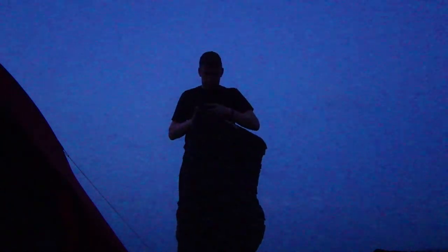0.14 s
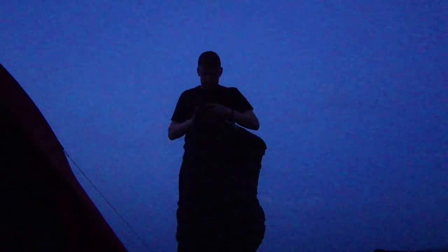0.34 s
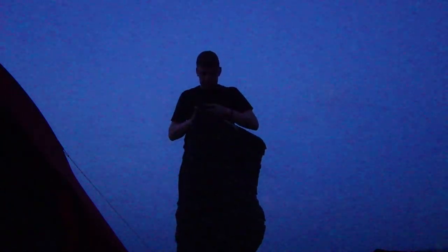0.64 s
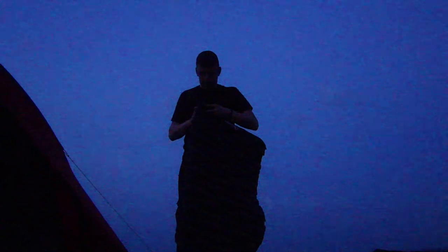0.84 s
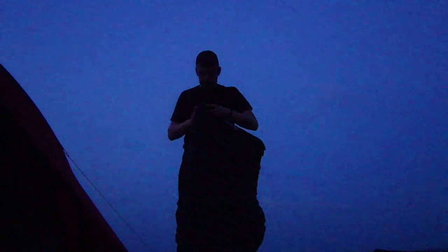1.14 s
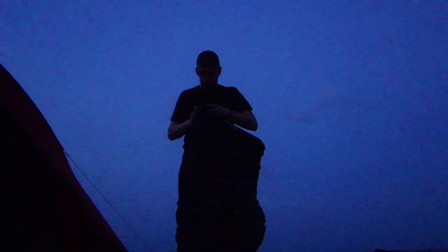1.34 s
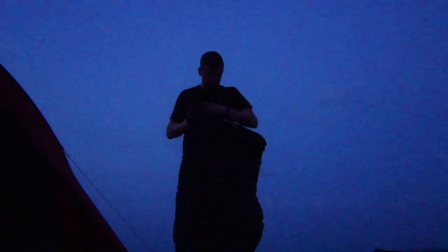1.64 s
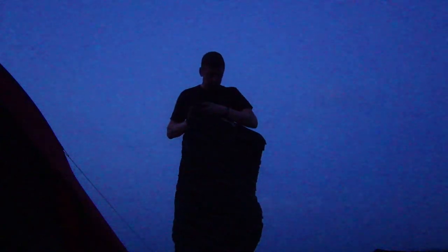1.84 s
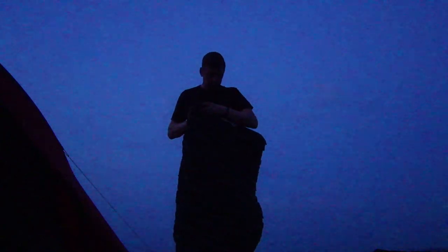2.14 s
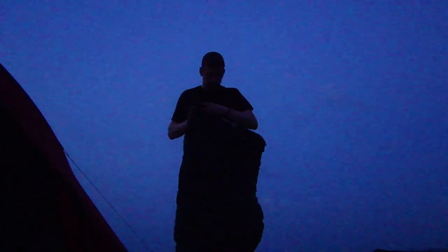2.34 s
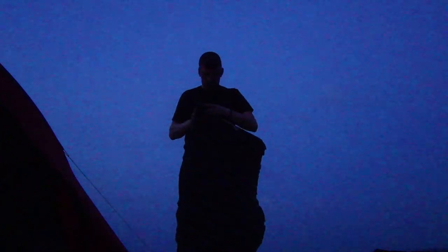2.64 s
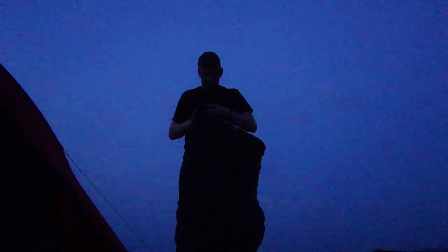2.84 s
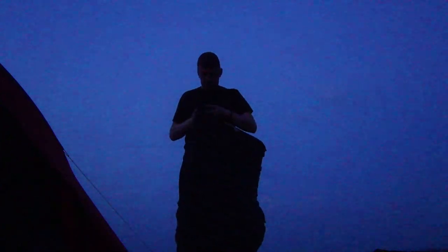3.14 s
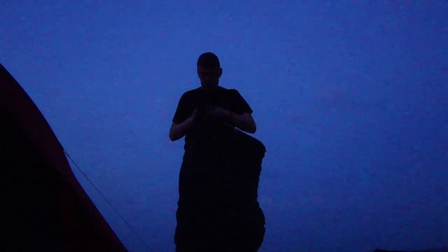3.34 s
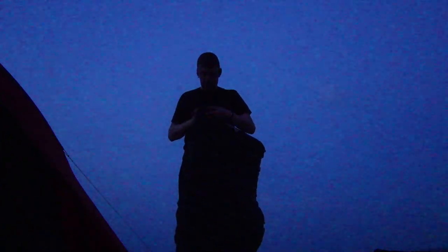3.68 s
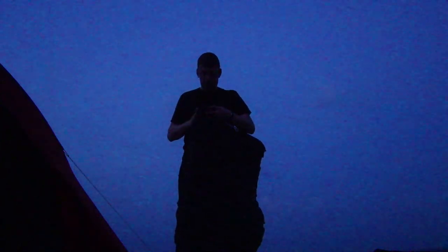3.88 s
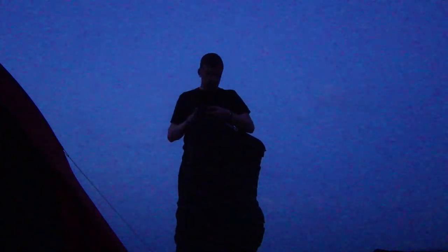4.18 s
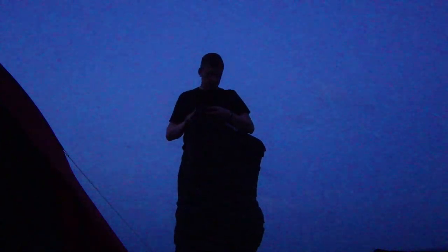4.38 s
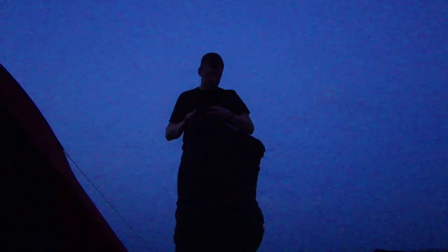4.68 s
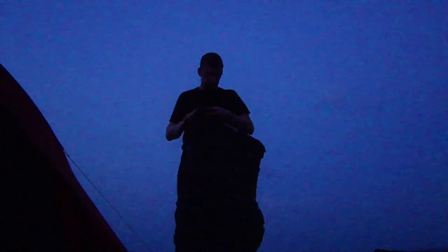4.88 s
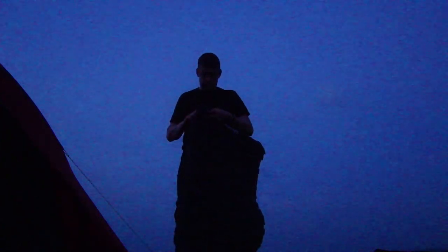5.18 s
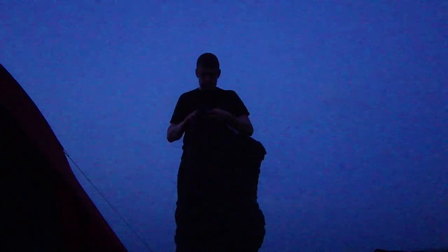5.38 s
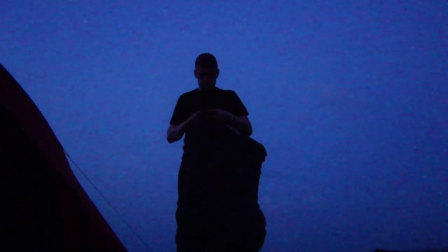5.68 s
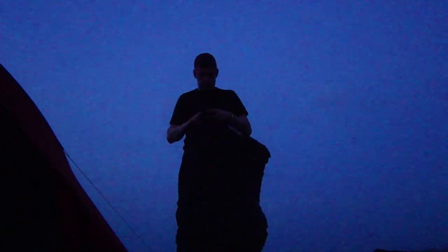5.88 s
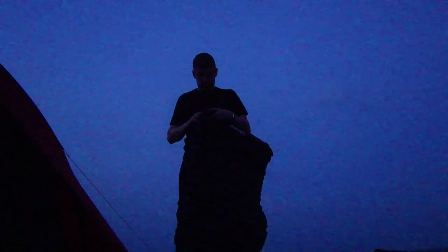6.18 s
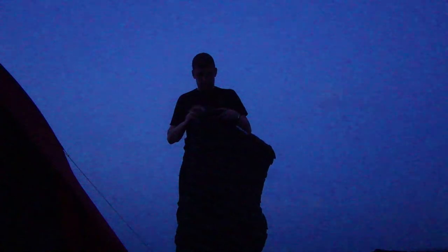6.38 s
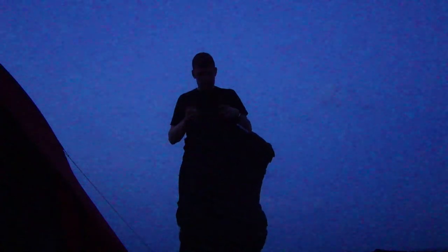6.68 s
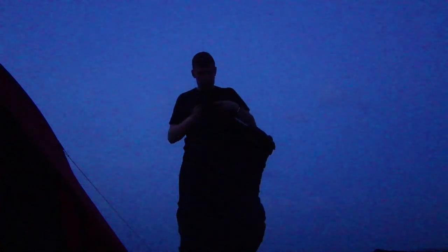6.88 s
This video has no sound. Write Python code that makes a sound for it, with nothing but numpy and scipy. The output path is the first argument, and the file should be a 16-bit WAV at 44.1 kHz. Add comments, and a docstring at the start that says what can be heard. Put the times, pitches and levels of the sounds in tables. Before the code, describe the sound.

A small handheld battery pump whines thinly over rushing air, then switches off, coasting down with a sigh and brief hoot before plastic clicks.

```python
"""A thin whine over rushing air: a small battery pump, held in the hands, inflates a sleeping pad outdoors.
A few steps off, two microphones hear impeller harmonics, and turbulence in the resonances of the air path.
Switched off, the pump coasts down: an upper nozzle resonance sighs and the nozzle hoots briefly.
Then come taps and rubs, clicks of the plastic nozzle ringing in damped modes, and the valve cap's click.
Beneath it all lies steady, wide, distant outdoor noise."""
import sys
import numpy as np
from scipy import signal
from scipy.fft import rfft, irfft, next_fast_len
from scipy.io import wavfile

SR = 44100
rng = np.random.default_rng(int(sys.argv[2]) if len(sys.argv) > 2 else 0)


def store_wav(level_fs):
    """Save 16-bit WAV to argv[1]."""
    pcm = np.round(np.clip(np.atleast_2d(level_fs), -1, 1) * 32767)
    wavfile.write(sys.argv[1], SR, pcm.T.astype(np.int16))


N = 309582
T = np.arange(N) / SR   # seconds
SWITCH_OFF_S, AIR_STOPS_S = 4.722, 5.97
CUTOFF_HZ = 12950


def from_db(db):
    """Decibels to gain."""
    return 10 ** (np.asarray(db) / 20)


def rms_one(x):
    """Scale to rms 1."""
    return x / np.sqrt(np.mean(x ** 2) + 1e-20)


def in_time(rows):
    """Columns of a curve, one value per sample."""
    s, *columns = np.transpose(rows)
    return [np.interp(T, s, column) for column in columns]


def within(start_s, end_s, fade_s):
    """1 from start to end, dying away exponentially outside."""
    outside_s = np.maximum(0, np.maximum(start_s - T, T - end_s))
    return np.exp(-outside_s / fade_s)


def at_hz(points, hz):
    """Read a spectrum on a log-frequency axis."""
    f, value = np.transpose(points)
    return np.interp(np.log(np.maximum(hz, 1)), np.log(f), value)


def colour(x, points):
    """Filter by a spectrum in dB."""
    size = next_fast_len(N + 4096)
    hz = np.arange(size // 2 + 1) * SR / size
    return irfft(rfft(x, size) * from_db(at_hz(points, hz)), size)[..., :N]


def without_bass(x, hz):
    """A small source radiates little below this pitch."""
    return signal.sosfilt(signal.butter(2, hz, "high", fs=SR, output="sos"), x)


def drift(rate_hz):
    """Smooth random wandering, spread 1: noise through two equal low-pass poles."""
    step = 40   # samples between the slow values
    r = np.exp(-2 * np.pi * rate_hz * step / SR)
    noise = rng.standard_normal(N // step + 2002)
    slow = signal.lfilter([1], [1, -2 * r, r * r], noise)[2000:]   # drop the settling
    return np.interp(np.arange(N) / step, np.arange(len(slow)), rms_one(slow))


def resonate(x, hz, width_hz):
    """Two-pole resonance, gain 1 on top."""
    r = np.exp(-np.pi * width_hz / SR)
    feedback = [1, -2 * r * np.cos(2 * np.pi * hz / SR), r * r]
    return signal.lfilter(np.array([1, 0, -1]) * (1 - r * r) / 2, feedback, x + 1e-18)


def moving_band(hz, width_hz, order):
    """Turbulence in a resonance whose centre moves: slow noise on two carriers a quarter turn apart; rms 1."""
    lowpass = signal.butter(order, width_hz / 2, fs=SR, output="sos")
    a, b = signal.sosfilt(lowpass, rng.standard_normal((2, N)))
    phase = 2 * np.pi * np.cumsum(hz) / SR
    return rms_one(a * np.cos(phase) + b * np.sin(phase))


def coasted():
    """Seconds since the switch was thrown."""
    return np.maximum(T - SWITCH_OFF_S, 0)


def speed_share():
    """Share of full speed left as air and bearings brake the impeller."""
    air_drag, bearing_drag = .337, .981   # per s
    return np.exp(-bearing_drag * coasted()) / (1 + air_drag * coasted())


# impeller under power: start_s [s], speed [turns per s]
SPEED = [(0, 699.0), (0.35, 701.2), (0.68, 705.1), (1.3, 703.6), (1.55, 701.8), (1.73, 704.6),
         (2.15, 701.4), (2.7, 704.1), (3.35, 704.4), (3.8, 700.3), (4.0, 702.5), (4.68, 701.2)]


def shaft_speed():
    """Turns per second: the powered speed, braked after switch-off, with a slight random unsteadiness."""
    return in_time(SPEED)[0] * speed_share() * (1 + .0007 * drift(45))


# once-per-turn hum, before its gain: start_s [s], level_db [dB]
HUM = [(0.0, -42), (0.28, -51.5), (0.7, -44.5), (1.5, -40), (2.4, -38.5), (3.0, -44), (3.5, -42),
       (4.5, -34), (4.72, -36)]
# blade-passing tone under power, six per turn: start_s [s], level_db [dB]
BLADE = [(0.1, -29.5), (0.75, -35), (1.5, -31.5), (2.5, -30.5), (3.1, -34), (3.45, -31.5), (3.67, -26.5),
         (4.08, -37.5), (4.35, -33), (4.72, -33.5)]
# seventh harmonic under power, a thin whine above the blade tone: start_s [s], level_db [dB]
SEVENTH = [(0, -38), (0.8, -35), (1.2, -41), (1.55, -38.5), (2.45, -37), (2.65, -46), (2.95, -39.5),
           (3.3, -61), (3.68, -41), (4.1, -45), (4.7, -45)]
# numbers of the harmonics that swell on their own under power
SWELLING = (3, 5, 8, 9, 11, 12, 13, 14, 15, 18)
# a row for each of those: level_db [dB], cupped_db [dB gained in cupped hands], fill_db [dB per s as the pad fills]
OVERTONES = [(-35.5, 7.5, -1.6), (-35.5, 1.5, -1.4), (-62.5, 3, 1), (-57, 8.5, -0.044), (-48, -3, -2.5),
             (-54, -2, 1), (-48.5, -4, 0), (-44.5, 9, -2), (-37, -1.5, -0.72), (-54, -3, 1)]
# how the housing radiates harmonics up to the thirteenth, before its gain: pitch_hz [Hz], level_db [dB rms]
HOUSING = [(600, -62), (1400, -48), (2700, -49), (3500, -44), (4700, -44), (5400, -51), (6100, -58),
           (7400, -59), (8400, -54)]
# the motor's higher buzz, from the fourteenth harmonic: pitch_hz [Hz], level_db [dB rms]
BUZZ = [(3000, -57), (3900, -49), (4700, -59), (6500, -65), (8200, -62), (9150, -54), (9800, -59),
        (10600, -44), (11300, -54), (12000, -61), (12700, -60)]


def whine(hum_db=5.0, housing_db=1.0, wander_db=3.0, fading_db=2.0, commutator_db=10.0, speed_power=1.33):
    """Shaft harmonics slide through the housing's response and weaken as the impeller slows."""
    speed, share = shaft_speed(), speed_share()
    angle = 2 * np.pi * np.cumsum(speed) / SR
    hum = from_db(in_time(HUM)[0] + hum_db) * share ** 4.2 * np.sin(angle)
    coasting_db = 20 * np.log10(share ** speed_power / (1 + (0.19 / share) ** 10))

    hollow_hz = in_time(HANDS)[0]
    cupped = (hollow_hz.max() - hollow_hz) / np.ptp(hollow_hz)   # 0 open, 1 most cupped
    swells = {}
    for k, (level_db, cupped_db, fill_db) in zip(SWELLING, OVERTONES):
        swells[k] = level_db + cupped_db * cupped + fill_db * T + wander_db * drift(2.0)
    swells[6], swells[7] = in_time(BLADE)[0], in_time(SEVENTH)[0]

    powered = within(0, SWITCH_OFF_S, fade_s=0.034)
    out = hum
    for k in range(2, 49):
        response, gain_db = (HOUSING, housing_db) if k <= 13 else (BUZZ, 0)
        # the three-part commutator lifts every third harmonic over its neighbours
        lift_db = commutator_db / 2 * (1 if k % 3 == 0 else -1)
        level_db = at_hz(response, k * speed) + gain_db + lift_db + fading_db * drift(4.3)
        if k in swells:   # held to its own curve under power, then free
            level_db += powered * (swells[k] - level_db)
        audible = k * speed < CUTOFF_HZ
        tone = np.sin(k * angle + rng.uniform(0, 2 * np.pi))
        out += from_db(level_db + coasting_db) * audible * tone
    return np.sqrt(2) * out


def blown(modes, flutter_db):
    """Turbulence in steep fixed resonances, each fluttering on its own; the high ones die first as the air slows."""
    dulling = 5   # dB per octave and s once switched off, pivoting on the second resonance
    out = 0
    for hz, width_hz, db in modes:
        once = resonate(rng.standard_normal(N), hz, width_hz)
        band = rms_one(resonate(once, hz, width_hz))
        dulling_db = dulling * np.log2(hz / modes[1][0]) * coasted()
        out = out + from_db(db - dulling_db + flutter_db * drift(13.6)) * band
    return out


# resonances of the air path, each passed twice: pitch_hz [Hz], width_hz [Hz per pass], level_db [dB]
RUSH = [(900, 1520, -10), (1702, 530, -0.5), (1952, 360, -6.5), (2450, 700, -17), (3150, 280, -16.5),
        (3760, 1860, -11.5), (4960, 550, -20.5), (7660, 1800, -20)]
# hissing resonances above them, the same columns
LOW_HISS = [(8440, 290, -5.5), (9300, 1000, -1)]


def airflow():
    """Rush and hiss of the air driven through the housing; both grow where the intake is throttled."""
    suction_db = in_time(HANDS)[1]
    throttled_db = suction_db.mean() - suction_db
    # level in dB, dB gained per dB of suction lost, fall in dB per s once switched off
    rush_db = -26 + 0.1 * throttled_db - 17 * coasted()
    hiss_db = -41 + 0.24 * throttled_db - 19 * coasted()
    rush = from_db(rush_db) * blown(RUSH, flutter_db=1.5)
    hiss = from_db(hiss_db) * blown(LOW_HISS, flutter_db=2.23)
    return (rush + hiss) * within(0, AIR_STOPS_S, fade_s=0.13)


# sizzle at the blade tips, before its gain: start_s [s], level_db [dB]
SIZZLE = [(0.0, -37), (0.9, -32), (1.15, -30), (1.95, -30), (2.6, -36), (2.98, -30.5), (3.15, -39.5),
          (3.55, -31.5), (4.55, -41), (4.75, -33.5)]


def sizzle(gain_db=-2.5, flutter_db=1.64, speed_power=1.75, full_speed_hz=11300):
    """Air sheared at the blade tips; the band weakens and sinks a little as the impeller slows."""
    share = speed_share()
    band = moving_band(full_speed_hz * share ** 0.045, width_hz=970, order=2)
    level = from_db(in_time(SIZZLE)[0] + gain_db + flutter_db * drift(25)) * share ** speed_power
    return level * band * within(0, AIR_STOPS_S, fade_s=0.31)


# the hands shift round the intake:
# start_s [s], pitch_hz [Hz, resonance of their hollow], level_db [dB of suction, before the gains of its parts]
HANDS = [(0, 2858, -22), (0.7, 2812, -21.5), (1.3, 2776, -23), (1.5, 2400, -22), (2.3, 2377, -23),
         (2.5, 2770, -21.5), (3.01, 2654, -19.5), (3.13, 2470, -25), (3.3, 2460, -22.5),
         (3.43, 2547, -18.5), (3.75, 2530, -22), (4.25, 2550, -25), (4.39, 2570, -32.5), (4.6, 2560, -36),
         (4.76, 2570, -22)]


def intake(peak_db=-2.5, broad_db=-2.0, flutter_db=1.0, gust_db=1.0, broad_hz=2650, counter_share=.4):
    """Suction roars between the fingers; the hollow of the hands nearly whistles, and the roar shifts against it."""
    hollow_hz, suction_db = in_time(HANDS)
    peak = from_db(peak_db + flutter_db * drift(4.6)) * moving_band(hollow_hz, width_hz=260, order=2)
    roar_hz = broad_hz - counter_share * (hollow_hz - hollow_hz.mean())
    broad = from_db(broad_db) * moving_band(roar_hz, width_hz=1110, order=4)
    fall_db = 37 * coasted()   # 37 dB per s
    return from_db(suction_db + gust_db * drift(31) - fall_db) * (peak + broad)


# breathy nozzle resonance, before its gain: start_s [s], level_db [dB]
NOZZLE_LEVEL = [(0, -33.5), (1.8, -32), (3.2, -30.5), (3.75, -29), (4.33, -27.5), (4.57, -35),
                (4.77, -24.5), (4.92, -30)]


def nozzle_breath(gain_db=4.5, flutter_db=0.67, start_hz=1380, sag_hz_per_s=18, lowest_hz=1045):
    """Breath in the nozzle's resonance, sinking as the pad fills, then with a power of the impeller's speed."""
    hz = np.maximum((start_hz - sag_hz_per_s * T) * speed_share() ** .52, lowest_hz)
    level_db = in_time(NOZZLE_LEVEL)[0] - 12.5 * coasted()   # falls 12.5 dB per s
    breath = moving_band(hz, width_hz=165, order=2)
    level = from_db(level_db + gain_db + flutter_db * drift(7.9))
    return level * breath * within(0, 5.62, fade_s=0.21)


# distant outdoor noise, shape only: pitch_hz [Hz], level_db [dB per Hz]
OUTDOORS = [(25, -28), (50, -19), (80, -13.5), (130, -3), (300, 0), (500, -3.5), (850, 4), (1150, 3),
            (2000, -8), (4000, -11.5), (6000, -17), (9000, -17), (12500, -25)]
# its width at the two microphones: pitch_hz [Hz], side_db [dB, side re mid]
OUTDOORS_SIDE = [(60, -3), (120, -2), (230, 2), (460, 8.5), (900, -1), (1770, 3.5), (3490, 3), (6860, 3),
                 (13500, -3)]


def outdoors(mid_db=-41):
    """Steady, wide noise from far away: independent mid and side noise, coloured alike, the side then reshaped."""
    mid, side = colour(rng.standard_normal((2, N)), OUTDOORS)
    side = colour(side, OUTDOORS_SIDE)
    return from_db(mid_db) * np.array([mid + side, mid - side]) / np.std(mid)


def overblow(start_s=4.85, length_s=.75, start_hz=1892, sag_hz=120.5, level_db=-24, fall_db=12.5):
    """The nozzle's upper resonance sighs downward, ever faster, with the last of the air."""
    age = np.clip((T - start_s) / length_s, 0, 2)   # in lengths; sag and fall are reached after one
    band = moving_band(start_hz - sag_hz * age ** 2, width_hz=350, order=2)
    return from_db(level_db - fall_db * age) * band * within(start_s, start_s + length_s, fade_s=0.2)


# the nozzle locks into a hoot: start_s [s], pitch_hz [Hz], level_db [dB rms]
HOOT = [(4.95, 1056, -29), (5.005, 1046, -26), (5.032, 1033, -10.5), (5.13, 998, -13), (5.27, 988, -16.5),
        (5.33, 982, -19.5), (5.39, 970, -27), (5.44, 960, -29), (5.52, 922, -44)]


def nozzle_hoot(octave_db=-26):
    """The nozzle's tone and a faint octave waver in pitch and level while the flow dies."""
    hoot_hz, level_db = in_time(HOOT)
    phase = 2 * np.pi * np.cumsum(hoot_hz * (1 + .006 * drift(50))) / SR
    # the weaker the hoot, the less steady it is
    waver_db = np.clip(0.27 + 0.042 * (level_db.max() - level_db), 0, 4) * drift(35)
    tone = np.sin(phase) + from_db(octave_db) * np.sin(2 * phase)
    hoot = np.sqrt(2) * from_db(level_db + waver_db) * tone
    return hoot * within(HOOT[0][0], HOOT[-1][0], fade_s=0.013)


# fingers and pad tap and rub the case; the last two rows are the noise of the valve cap's click:
# start_s [s], level_db [dB peak], pitch_hz [Hz, centre], width_hz [Hz], length_s [s, time constant of swell and decay]
TAPS = [(5.7, -36, 3700, 1470, 0.069), (6.216, -35, 900, 900, 0.00073), (6.319, -34, 3000, 2000, 0.00071),
        (6.567, -36, 4500, 3000, .003), (6.625, -28, 800, 600, 0.0015), (6.683, -36, 5100, 1800, .004),
        (6.8808, -18, 2660, 2170, 0.00013), (6.881, -28, 950, 700, .002)]


def taps_and_cap_noise():
    """Damped contacts that swell and die, each with its own colour of noise."""
    out = np.zeros(N)
    for s, db, hz, width_hz, length_s in TAPS:
        age = np.clip((T - s) / length_s, 0, 20)
        contact = resonate(rng.standard_normal(N) * age * np.exp(-age), hz, width_hz)
        out += from_db(db) * contact / np.abs(contact).max()
    return out


def strike(hits, modes, scatter_db):
    """Each contact rings every damped mode with a strength of its own."""
    s, level_db = np.transpose(hits)
    out = np.zeros(N)
    for hz, db, t60 in modes:
        clicks = np.zeros(N)
        clicks[(s * SR).astype(int)] = from_db(level_db + db + rng.normal(0, scatter_db, len(s)))
        r = np.exp(-np.log(1000) / (t60 * SR))
        w = 2 * np.pi * hz / SR
        out += signal.lfilter([0, np.sin(w)], [1, -2 * r * np.cos(w), r * r], clicks + 1e-18)
    return out


# the nozzle snaps loose: start_s [s], level_db [dB, strength of the contact]
SNAPS = [(6.8188, -20), (6.8198, -22), (6.8212, -22), (6.8227, -19), (6.8305, -29)]
# modes of the plastic nozzle: pitch_hz [Hz], level_db [dB re the contact], t60_s [s]
PLASTIC = [(2200, -1, .018), (2530, -7, .012), (3140, -11, 0.0074), (3770, -10, 0.017), (4100, -7, 0.019),
           (5000, -23, 0.0055), (7400, -8, 0.012), (8550, -6, 0.0028), (10000, -11, 0.0064),
           (11500, -1, 0.004), (12500, -11, .005)]


def nozzle_snaps(count=8, gap_s=0.0027, level_db=-31, fall_db_per_s=220):
    """The nozzle slips free and scrapes on over the valve in a dying run of small contacts."""
    after_s = gap_s * (np.arange(1, count + 1) + rng.uniform(-.4, .4, count))
    scrape = [(SNAPS[-1][0] + s, level_db - fall_db_per_s * s) for s in after_s]
    return without_bass(strike(list(SNAPS) + scrape, PLASTIC, scatter_db=4.0), hz=1710)


# the valve cap clicks shut: start_s [s], level_db [dB, strength of the contact]
CAP_CLICK = [(6.8803, -18.5)]
# modes of the soft valve cap: pitch_hz [Hz], level_db [dB re the contact], t60_s [s]
CAP = [(950, -19, .014), (1900, -11, .004), (2780, 9, 0.0026), (3700, -5, 0.0033), (9500, -18, 0.00058)]


def cap_click():
    """The soft cap's short modes ring once as it shuts."""
    return without_bass(strike(CAP_CLICK, CAP, scatter_db=2.0), hz=800)


# sound scattered by nearby surfaces: pitch_hz [Hz], level_db [dB re the direct sound]
SCATTER = [(1000, -22), (3000, -18), (9000, -14)]


def surroundings(x, decay_s=0.0041, size=4096):
    """Body, pad and ground scatter a little sound, differently to each microphone and more in the treble."""
    t = np.arange(size) / SR
    echoes = rng.standard_normal((2, size)) * np.exp(-t / decay_s) * (t > .001)
    echoes /= np.sqrt(np.sum(echoes ** 2, axis=1, keepdims=True))
    scattered = signal.fftconvolve(x[None], echoes, axes=1)[:, :N]
    return x + colour(scattered, SCATTER)


# the pump at the two microphones: pitch_hz [Hz], balance_db [dB, left re right]
PUMP_BALANCE = [(300, -3), (700, -1), (1000, 0), (1350, 1), (1900, -1), (2600, -3.5), (3400, -1.5),
                (4200, 3.5), (6000, 5.5), (8500, 1), (12000, 2)]
# and: pitch_hz [Hz], lead [radians by which the left leads]
PUMP_PHASE = [(400, .15), (1000, .25), (2300, .35), (4300, .65), (8000, .6), (12000, .65)]


def microphones(pair):
    """The two microphones hear the pump with opposite offsets of level and phase."""
    size = next_fast_len(N + 4096)
    hz = np.arange(size // 2 + 1) * SR / size
    offset = from_db(at_hz(PUMP_BALANCE, hz) / 2) * np.exp(1j * at_hz(PUMP_PHASE, hz) / 2)
    return irfft(rfft(pair, size) * np.array([offset, 1 / offset]), size)[:, :N]


# turbulence that reaches the two sides differently: pitch_hz [Hz], level_db [dB re the direct sound]
SPREAD = [(1000, -20), (2500, -15), (4000, -11), (10000, -9)]


def scene():
    """The pump and its handling, a few steps in front of the microphones, over the outdoor noise."""
    air = airflow() + sizzle() + intake() + nozzle_breath() + overblow() + nozzle_hoot()
    handling = taps_and_cap_noise() + nozzle_snaps() + cap_click()
    pump = without_bass(whine() + air + handling, hz=150)
    stray = colour(airflow() + sizzle(), SPREAD)   # fresh turbulence, opposite at the two sides
    return microphones(surroundings(pump) + np.array([stray, -stray])) + outdoors()


def record(dry):
    """The top is cut steeply."""
    return signal.sosfilt(signal.ellip(10, .2, 80, CUTOFF_HZ, fs=SR, output="sos"), dry)


dry = scene()
out = record(dry)
store_wav(out)
```